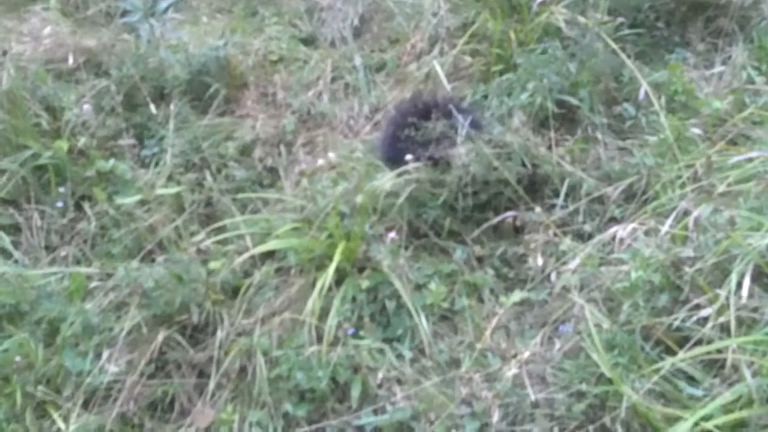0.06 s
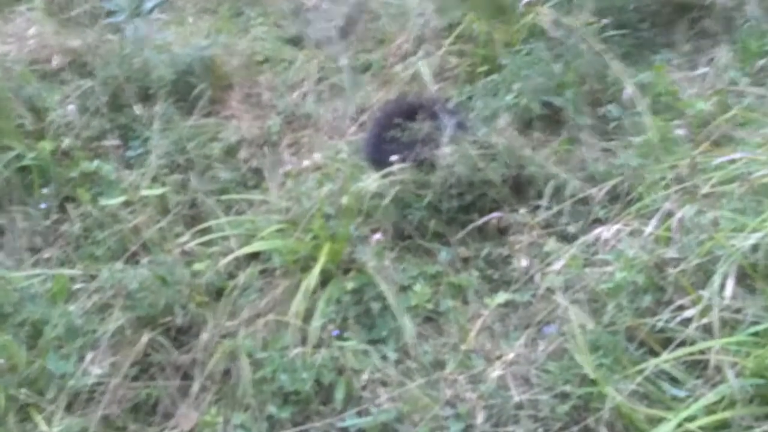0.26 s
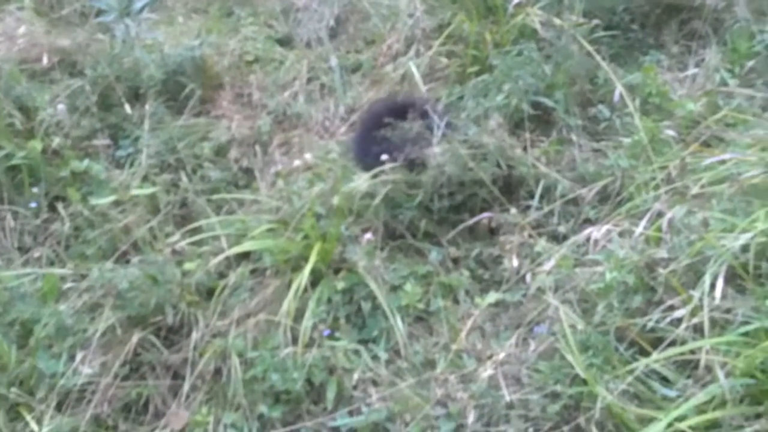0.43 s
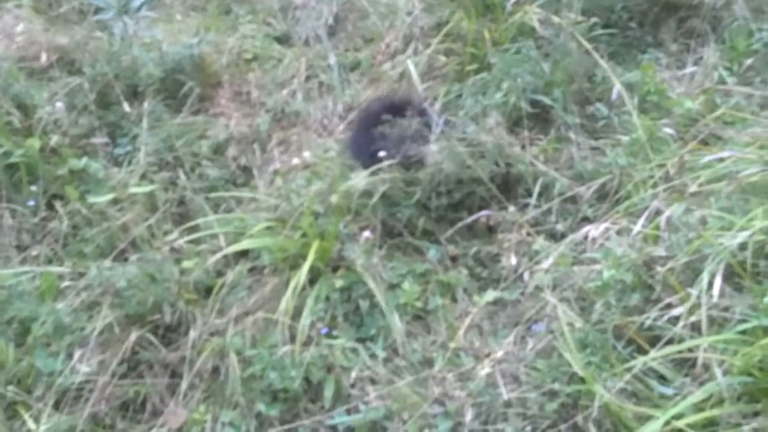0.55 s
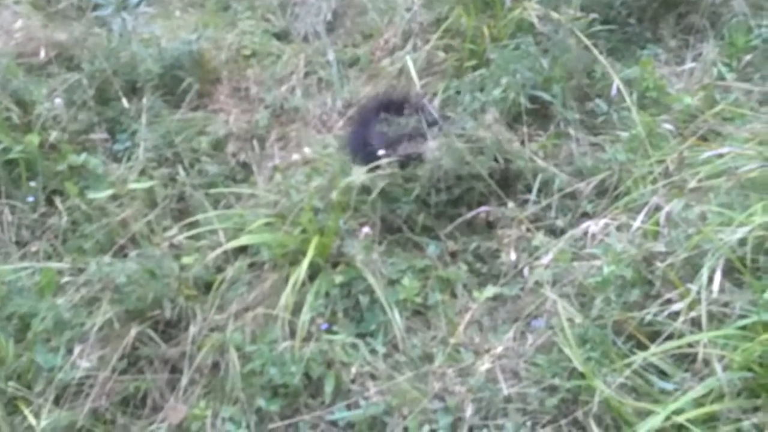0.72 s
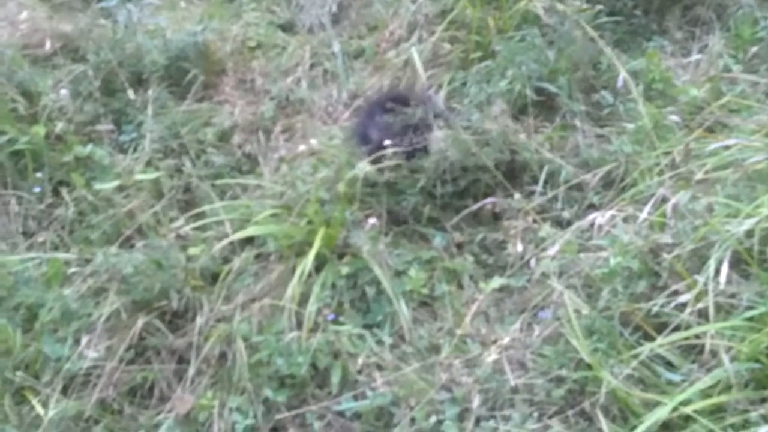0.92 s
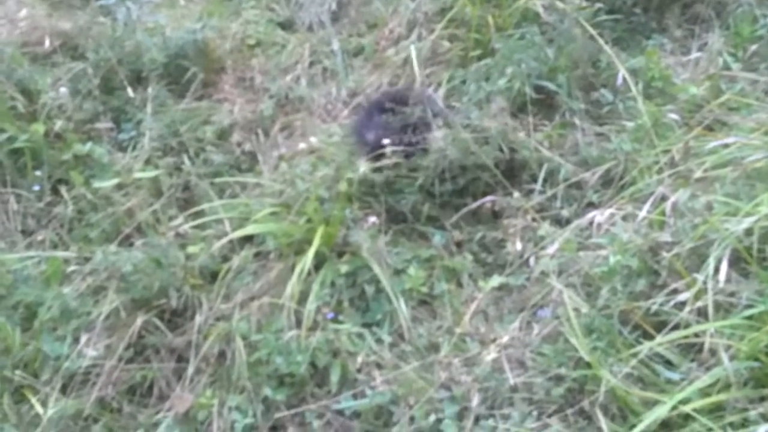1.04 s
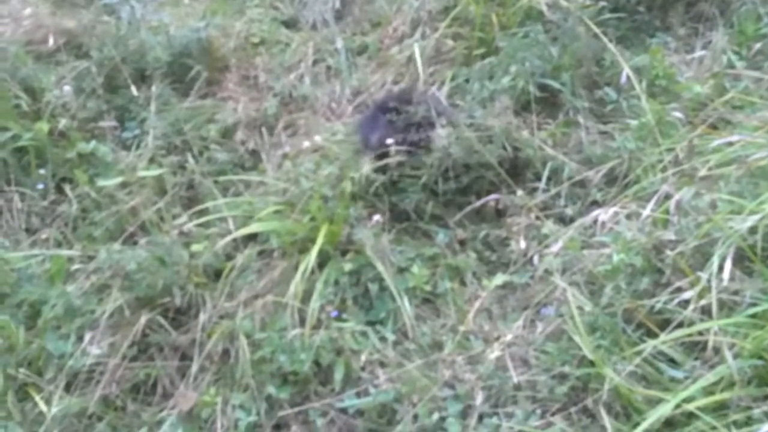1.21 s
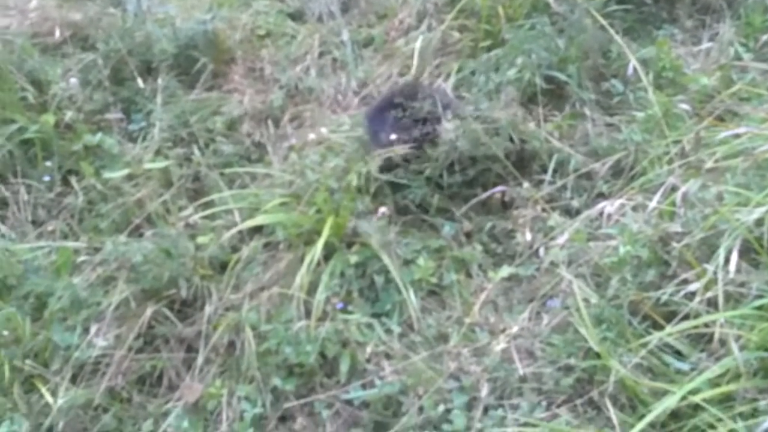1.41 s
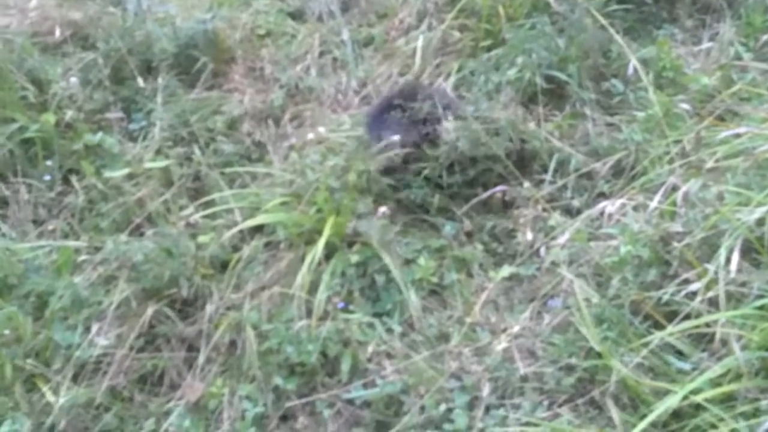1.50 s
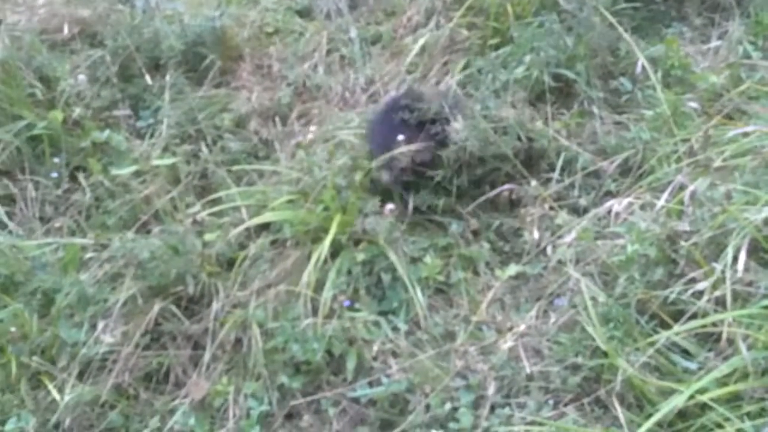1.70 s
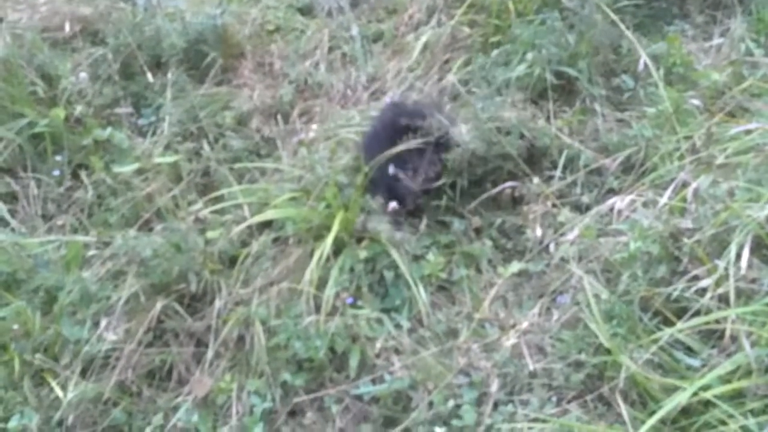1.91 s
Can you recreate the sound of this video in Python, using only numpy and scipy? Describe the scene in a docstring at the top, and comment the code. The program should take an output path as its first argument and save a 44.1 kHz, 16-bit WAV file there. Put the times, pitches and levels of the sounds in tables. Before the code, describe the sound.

Camera handling noise right at the microphone: a sharp rattling knock, a pause, two dull bumps, then a second knock. Soft outdoor air hisses throughout, while a distant bird trills early on and insects chirp faintly in the grass.

```python
"""A quiet grassy field, where a hand shifts on a camera: two sharp knocks, two soft bumps between.
Each knock is a bunch of tiny taps that ring the plastic case, thump the body and rattle loose parts.
Air hisses steadily, a small bird trills twice far off and insects chirp faintly.
The camera widens the stereo sound of its two microphones."""
import sys
import numpy as np
from scipy.fft import rfft, irfft, next_fast_len
from scipy.io import wavfile
from scipy.ndimage import map_coordinates

SR = 44100
rng = np.random.default_rng(int(sys.argv[2]) if len(sys.argv) > 2 else 0)


def unload_wav(signal):
    """Save mono or channel-first audio to the path in sys.argv[1] as 16-bit WAV at rate SR, clipped to [-1, 1]."""
    wavfile.write(
        sys.argv[1],
        SR,
        np.round(np.clip(np.atleast_2d(signal).T, -1, 1) * 32767).astype(np.int16),
    )


N = 85995


def amp(db):
    """Turn decibels into a number to multiply by."""
    return 10 ** (np.asarray(db) / 20)


def unit(x):
    """Scale a sound to an average (rms) level of 1."""
    return x / np.sqrt(np.mean(x ** 2) + 1e-20)


def gains(table, hz):
    """Read each decibel column of a tone table at these frequencies, as gains."""
    table_hz, *columns = np.transpose(table)
    return amp([np.interp(np.log(hz + 1), np.log(table_hz), db) for db in columns])


def filtered(x, response):
    """Turn each frequency in x up or down as response says."""
    n = x.shape[-1]
    padded = next_fast_len(n + 8192)
    return irfft(rfft(x, padded) * response(np.fft.rfftfreq(padded, 1 / SR)), padded)[..., :n]


def wobble(rate, n):
    """A smooth curve through rate random values a second."""
    return map_coordinates(rng.standard_normal(4096), [np.arange(n) * rate / SR], mode="wrap")


def strike(t, rise_s, fade_s):
    """The loudness of a hit: it rises fast and loses 60 dB every fade_s."""
    return (1 - np.exp(-t / rise_s)) * np.exp(-np.log(1000) * t / fade_s)


def add(out, start_s, x):
    """Mix x into out, beginning at start_s."""
    i = max(0, round(start_s * SR))
    out[..., i:i + x.shape[-1]] += x[..., :N - i]


# Sounds have two rows: mid is what left and right share, side is how they differ.
# Tone of the air: frequency_hz, mid_db_per_hz, side_db_per_hz
AIR_TONE = [(31.5, -82, -94), (58, -100, -106), (79, -77, -89), (127, -77.5, -89.3), (202, -85, -90.5),
            (298, -82, -89.5), (633, -93, -94.5), (1110, -99.5, -104), (2070, -97.5, -100.5),
            (2450, -102, -102), (3780, -100.4, -103.1), (3980, -102.5, -95.5), (5264, -84, -85),
            (5870, -100.5, -117), (6700, -103.5, -107), (8940, -105, -103), (9500, -106, -104.5),
            (12150, -111.5, -110.5), (14700, -113.5, -115)]
# How the air rises and falls: time_s, rush_db, hiss_db
AIR_SWELL = [(0, 2, -2), (.17, -3.5, -3.5), (.46, 1, -0.5), (.9, 0, -1), (1.23, -3, -2.5), (1.6, -2, -2.2),
             (1.95, -2.5, -3.5)]

def air():
    """A soft low rush of outdoor air and a high hiss, each swelling and sinking a little."""
    time_s, rush_db, hiss_db = np.transpose(AIR_SWELL)
    t = np.arange(N) / SR
    noise = filtered(rng.standard_normal((2, N)), lambda f: gains(AIR_TONE, f) * np.sqrt(SR / 2))
    rush = filtered(noise, lambda f: 1 / (1 + (f / 3300) ** 4))  # the part below 3300 Hz
    hiss = noise - rush
    rush_level = amp(np.interp(t, time_s, rush_db) - 0.1 * wobble(12, N))
    return rush * rush_level + hiss * amp(np.interp(t, time_s, hiss_db))


# The bird's trills: start_s, pitch_hz, level_db, note_count (gets rounded)
BIRD_TRILLS = [(0.0347, 7140, -56, 4.3), (0.3982, 7230, -53.5, 5.5)]
NOTE_S, NOTE_EVERY_S, DROP_PER_NOTE_HZ = 0.011, 0.014, 70

def bird():
    """A far-off bird sings fast runs of thin notes that step down in pitch."""
    out, progress = np.zeros(N), np.linspace(0, 1, round(NOTE_S * SR))
    scoop_hz = 3000 * (progress - 0.4) ** 2  # each note dips, then rises
    for start_s, pitch_hz, level_db, note_count in BIRD_TRILLS:
        for k in range(round(note_count)):
            hz = pitch_hz - DROP_PER_NOTE_HZ * k + scoop_hz + rng.normal(0, 30)
            rough_level = amp(level_db + 4 * wobble(490, len(progress)))
            whistle = np.sin(2 * np.pi * np.cumsum(hz) / SR)
            add(out, start_s + k * NOTE_EVERY_S, rough_level * np.sin(np.pi * progress) * whistle)
    return np.array([0.49 * out, out])  # more side than mid


# Insects in the grass: pitch_hz, chirps_per_s, level_db
INSECT_VOICES = [(6070, 11, -68), (6600, 11, -68.5)]
CHIRP_S, CHIRP_RISE_HZ, CHIRP_SCATTER_HZ, CHIRP_SCATTER_DB = 0.032, 454, 101, 1.2

def insects():
    """Distant insects make faint, short, rising chirps at a slightly uneven pace."""
    out, progress = np.zeros((2, N)), np.linspace(0, 1, round(CHIRP_S * SR))
    fade_in_out = np.sin(np.pi * progress) ** 2
    for pitch_hz, chirps_per_s, level_db in INSECT_VOICES:
        for k, (late, higher, louder) in enumerate(rng.standard_normal((24, 3))):
            start_s = (k + 0.5 + late / 5) / chirps_per_s
            hz = pitch_hz + CHIRP_SCATTER_HZ * higher + CHIRP_RISE_HZ * (progress - 0.5)
            chirp = fade_in_out * np.sin(2 * np.pi * np.cumsum(hz) / SR)
            if start_s * SR < N - 1:
                add(out[0], start_s, amp(level_db + CHIRP_SCATTER_DB * louder) * chirp)
    return out


# Rattles of the loose parts: start_s, level_db, fade_s, brightness_db_per_octave
PART_RATTLES = [(.2255, -50, 0.029, -2), (.2402, -35, 0.06, -4), (0.2429, -31.5, 0.038, 2),
                (0.246, -36, 0.23, -1), (.265, -45, 0.22, 2.5), (0.989, -55, 0.18, -9),
                (1.24, -48.5, 0.039, -6), (1.6074, -48, 0.16, 1.5), (1.6236, -38, .09, -4.5),
                (1.6304, -33.5, .11, -5), (1.647, -46.5, .15, 5.5)]
# Their overall tone: frequency_hz, mid_db, side_db
RATTLE_TONE = [(100, -43, -45), (504, -1, -8), (840, 3, -3), (1640, -3, 3), (2320, 3, -1.5),
               (3200, -2.5, 0), (4270, -2.5, -1), (4930, -6, -14), (5500, 3, 4.5), (6350, -16, -23),
               (7680, -1, 1.5), (9640, -7.5, -7), (11800, -11.5, -11), (13700, -17, -17),
               (15500, -14, -8.5)]
# Pitches that ring out in the rattle, from the loose parts and, near 5 kHz, the microphone opening:
# pitch_hz, width_hz, boost_db (negative is a dip)
RATTLE_RINGS = [(2990, 110, 10.5), (3672, 66, 9.5), (3620, 70, -4), (4150, 550, 6.5), (5080, 90, 19),
                (6950, 250, 7), (8150, 660, 4), (9610, 120, 11.5), (11430, 470, 9.5)]
GRAINS_PER_S, GRAIN_DB = 900, 2

def rattles():
    """Loose plastic parts chatter: grainy noise that rings at a few high pitches and dies away."""
    out, t = np.zeros((2, N)), np.arange(SR // 3) / SR
    for start_s, level_db, fade_s, brightness in PART_RATTLES:
        def tone(f):
            ring_db = sum(db / (1 + (2 * (f - hz) / width) ** 2) for hz, width, db in RATTLE_RINGS)
            treble_db = brightness * np.log2(np.maximum(f, 2000) / 4000)
            return gains(RATTLE_TONE, f) * amp(ring_db + treble_db)
        grains = rng.standard_normal((2, len(t))) * amp(GRAIN_DB * wobble(GRAINS_PER_S, len(t)))
        chatter = unit(filtered(grains, tone))
        add(out, start_s, amp(level_db) * chatter * strike(t, rise_s=0.0018, fade_s=fade_s))
    return out


# Taps on the case: start_s, level_db, brightness_db_per_octave, clack_db (added to level_db),
# ring_stretch (multiplies base_fade_s)
CASE_TAPS = [(.2395, -34.5, 12.5, -8, 0.84), (.2428, -26.5, 3.5, -6.5, 1.04), (.2484, -36.5, -0.5, 7, 0.36),
             (.2752, -37.5, 6, -5, 1.23), (.3035, -44, -3, 4.5, 0.54), (.324, -53.5, -2, -14, 0.96),
             (1.2408, -46.5, -12, -4, 0.76), (1.374, -62.5, -12, 6, 0.49), (1.381, -62, -7, 5, 0.63),
             (1.388, -53, -6, 2.5, .8), (1.396, -61, -20, 6, 1), (1.592, -63, -14, 4, 1),
             (1.6015, -55, -13, -7, 1.6), (1.6075, -52.5, -28, -7, 0.29), (1.624, -44.5, 12.5, -1, 0.5),
             (1.629, -38, 5, 0.5, 0.28), (1.6345, -35, -9, -2, 0.55), (1.6475, -40, -3, 3, 1.2),
             (1.68, -66.5, -13, 15, 3)]
# Pitches the case rings at: pitch_hz, ring_db, base_fade_s, side_share
CASE_RINGS = [(717, -3.5, 0.11, 0.072), (764, -1.5, 0.097, -0.084), (815, 0, 0.068, -0.089),
              (986, -2, 0.06, 0.038), (1054, -6, 0.023, -0.18), (1353, -27, 0.22, 0.13),
              (1515, -16, 0.13, 0.47), (1586, -5.5, 0.063, 0.4), (1751, -8, 0.049, 0.7),
              (1893, -20.5, 0.048, 0.32), (2276, -16, 0.12, 0.16)]
# Tone of the dull clack: frequency_hz, relative_db
CLACK_TONE = [(80, -101), (250, -67), (520, -76), (850, -61), (1600, -83.5), (2400, -76), (4200, -85.5),
              (7000, -89.5), (15000, -112)]
TAP_RISE_S, CLACK_FADE_S, SIDE_SCATTER_DB = 0.00019, 0.044, -34

def case_taps():
    """Each tap clacks and rings the case. Harder taps ring brighter; the grip cuts some short."""
    out, t = np.zeros((2, N)), np.arange(SR // 3) / SR
    pitch_hz, ring_db, base_fade_s, side_share = np.transpose(CASE_RINGS)[:, :, None]
    flip = np.pi * (np.arange(len(pitch_hz))[:, None] // 2)  # every other pair starts upside down
    for start_s, level_db, brightness, clack_db, ring_stretch in CASE_TAPS:
        strength = amp(ring_db + brightness * np.log2(pitch_hz / 1000) + rng.normal(0, 1.8, pitch_hz.shape))
        hz = pitch_hz * (1 + rng.normal(0, 0.0017, pitch_hz.shape))
        phase = 2 * np.pi * hz * t + flip
        loudness = strength * strike(t, TAP_RISE_S, base_fade_s * ring_stretch)
        ring = (loudness * np.sin(phase)).sum(0)
        spread = side_share + amp(SIDE_SCATTER_DB) * rng.standard_normal(hz.shape)
        side = (loudness * np.cos(phase) * spread).sum(0)  # a quarter wave ahead of the mid
        noise = unit(filtered(rng.standard_normal(len(t)), lambda f: gains(CLACK_TONE, f)[0]))
        noise = filtered(noise, lambda f: amp(brightness * np.log2(np.clip(f, 700, 2000) / 1000)))
        clack = amp(clack_db) * noise * strike(t, TAP_RISE_S, CLACK_FADE_S)
        add(out, start_s, amp(level_db) * np.array([ring + clack, side]))
    return out


# Thumps of the camera body: start_s, pitch_hz, level_db, fade_s, brightness_db_per_octave
BODY_THUMPS = [(0.2412, 267, -44, 0.086, 3), (0.2492, 248, -31.5, 0.15, -0.5),
               (.293, 335, -39.5, 0.071, -2), (1.2414, 280.7, -34.5, 0.11, 8),
               (1.389, 228, -39, 0.076, -10), (1.596, 253, -47.5, 0.3, -7), (1.627, 253.6, -32.5, 0.14, -1),
               (1.655, 255.5, -32.5, 0.1, -9)]
# The tones in each thump: pitch_ratio (multiplies pitch_hz), relative_db
THUMP_TONES = [(.57, -4), (0.784, 1.5), (0.998, 3.5), (1.398, -17.5)]

def thumps():
    """The whole camera shakes briefly in the hand, the same at both microphones."""
    out, t = np.zeros((2, N)), np.arange(SR // 3) / SR
    for start_s, pitch_hz, level_db, fade_s, brightness in BODY_THUMPS:
        shake = np.zeros(len(t))
        for pitch_ratio, relative_db in THUMP_TONES:
            wave = np.sin(2 * np.pi * (pitch_hz * pitch_ratio * t + rng.random()))
            shake += amp(relative_db + brightness * np.log2(pitch_ratio)) * wave
        add(out[0], start_s, amp(level_db) * shake * strike(t, rise_s=0.0028, fade_s=fade_s))
    return out


def scene():
    """Add up all the sounds, then turn mid and side into left and right."""
    mid, side = air() + bird() + insects() + rattles() + case_taps() + thumps()
    return np.array([mid + side, mid - side])


WIDEN_DELAY_S, HIGHEST_HZ = 1 / 2620, 15800

def record(dry):
    """The camera takes a delayed copy of each channel away from the other: a wide, hollow sound."""
    delayed_other = filtered(dry[::-1], lambda f: np.exp(-2j * np.pi * f * WIDEN_DELAY_S))
    wide = (dry - delayed_other) / 2
    return filtered(wide, lambda f: f < HIGHEST_HZ)  # cut the very highest treble


dry = scene()
out = record(dry)
unload_wav(out)
```